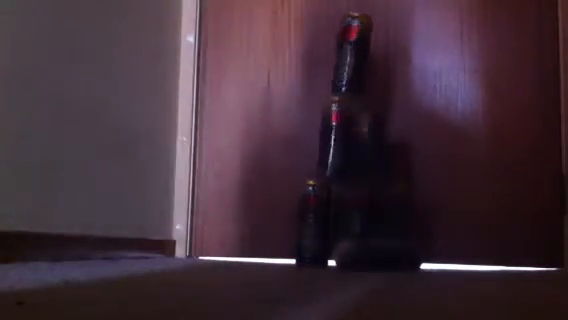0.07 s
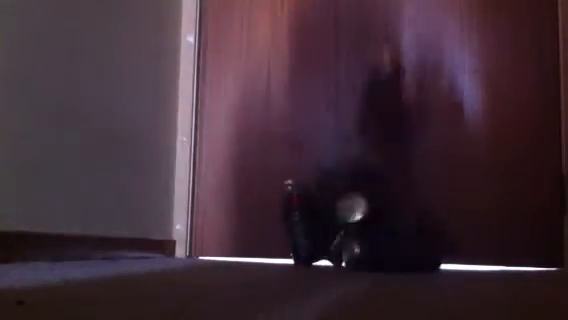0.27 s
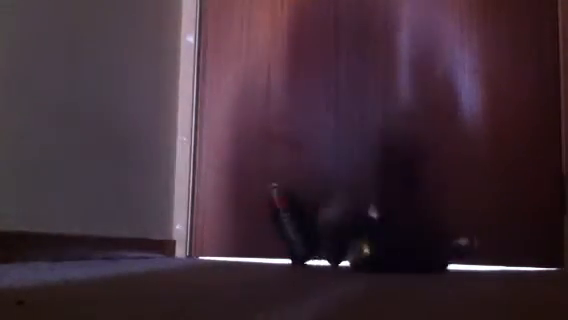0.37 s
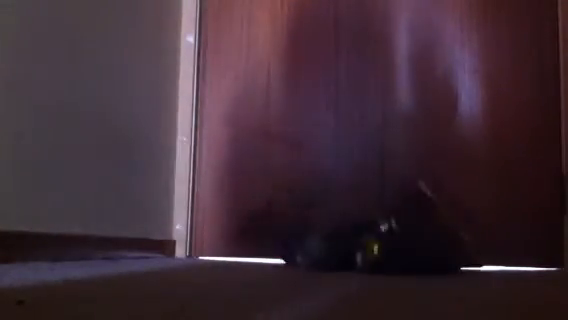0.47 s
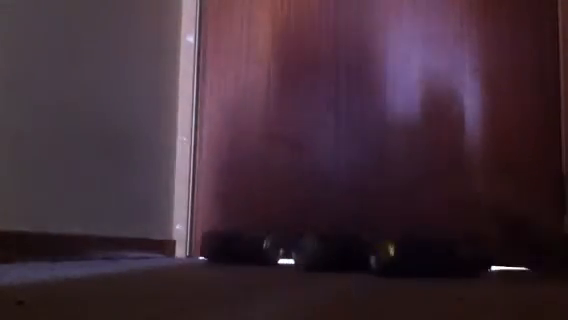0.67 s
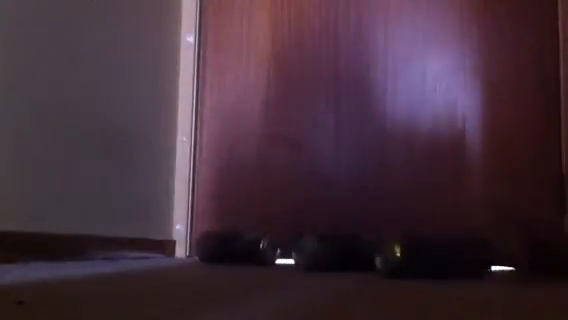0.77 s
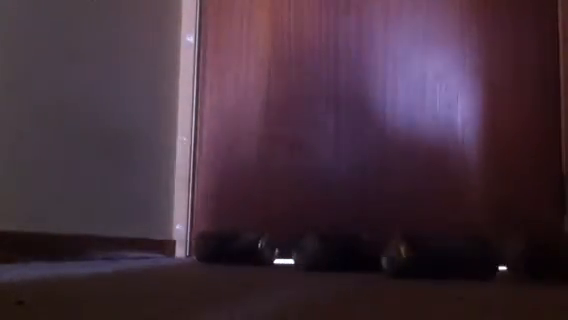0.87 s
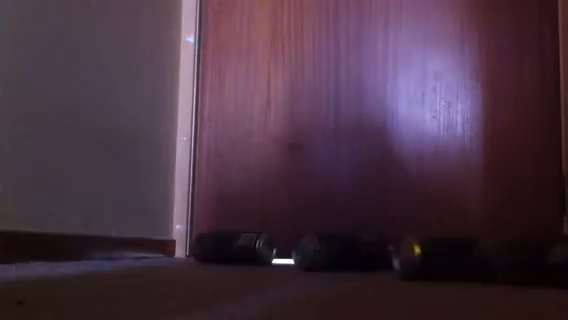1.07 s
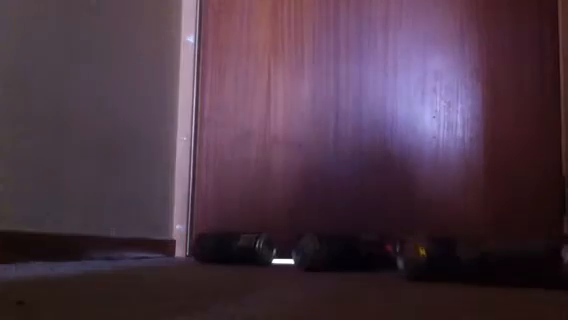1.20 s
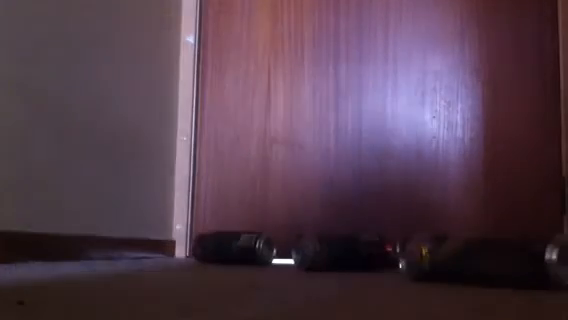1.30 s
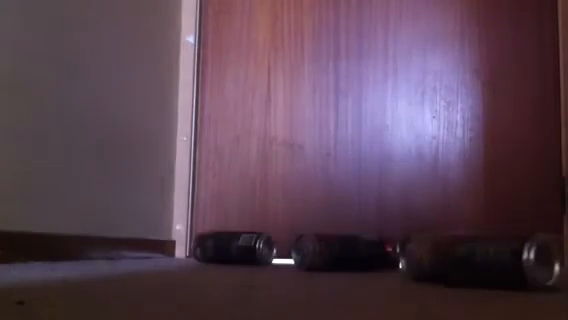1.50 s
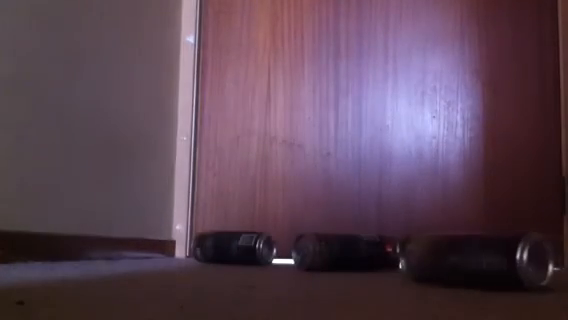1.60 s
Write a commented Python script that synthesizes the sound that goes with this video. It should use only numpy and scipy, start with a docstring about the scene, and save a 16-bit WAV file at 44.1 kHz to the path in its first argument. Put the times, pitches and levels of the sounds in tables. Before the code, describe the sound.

A stack of metal cans collapses close to the microphone in a small room. Light taps lead into dull thuds on the floor, then the cans bounce, clink and skid before settling over faint hiss.

```python
"""A stack of metal cans is knocked over by a wooden door, close to a small microphone in a small room.
Over faint steady hiss come a few light taps and clinks; at 0.2 s the cans hit the floor with dull thuds.
From 0.5 s they bounce again, clinking against each other, their rims chattering as they skid.
The room booms after each blow. The last soft landings come near 1 s, then one rim rolls to rest."""
import sys
import numpy as np
from scipy import signal
from scipy.fft import rfft, irfft
from scipy.io import wavfile

SR = 44100
rng = np.random.default_rng(int(sys.argv[2]) if len(sys.argv) > 2 else 0)


def generate_wav(signal):
    """Clip the signal to [-1, 1] and save it as 16-bit WAV at the path in sys.argv[1]."""
    frames = np.transpose(np.atleast_2d(signal))
    scaled = np.clip(frames, -1, 1) * 32767
    pcm = np.round(scaled).astype(np.int16)
    wavfile.write(sys.argv[1], SR, pcm)


N = 72765

# steady background: (frequency [Hz], spectral density [dB])
HISS_SPECTRUM = [(20, 3), (55, -16.5), (100, -12.5), (190, -3.5), (420, -7), (750, -9.5), (1330, -11.5),
                 (2760, -14.5), (6000, -16), (11000, -20), (15500, -18)]
# decay of the room: (frequency [Hz], t60 [s])
ROOM_DECAY = [(100, 0.55), (300, .4), (1000, 0.36), (4000, 0.33)]
# low resonances of floor, door and room: (frequency [Hz], relative level [dB], t60 [s])
BOOM_MODES = [(93.9, -17.5, 0.69), (129.6, -17, 0.31), (154.2, -9.5, .32), (200.7, -19.5, .47),
              (225.3, -8.5, 0.09), (250.9, -23, 0.51), (288.7, -22, 0.79), (311.3, -11, .28),
              (367, -11.5, .5), (435.4, -7.5, 0.36), (484, -10, 0.12)]
# rims skidding and rolling: (time [s], length [s], level [dB], start pitch [Hz], end pitch [Hz])
RIM_SKIDS = [(.25, 0.026, -47.5, 767, 664), (.300, 0.059, -58.5, 1017, 1020),
             (.575, 0.021, -60, 1030, 1240), (.595, .085, -63.5, 916, 790), (.827, 0.026, -64, 944, 825),
             (1.041, 0.13, -73, 284, 294.3)]
# modes of a can: (frequency [Hz], relative level [dB], t60 [s])
CAN_MODES = [(855.4, -11, 0.94), (970, -6, 0.31), (1007, -8.5, 0.15), (1072, -14, 0.7), (1230, -18, 0.11),
             (1297, -18, .18), (1455, -17.5, .15), (1570, -17, 0.13), (1860, -23.5, .14),
             (2328, -24.5, .12), (2570, -20, .15), (2663, -19.5, 0.14), (2760, -28, 0.24)]
# can striking can: (time [s], level [dB], brightness [dB], share of the free ring time [0-1])
CAN_CONTACTS = [(.079, -46, -3.5, .75), (.112, -53, 0, 0.94), (.206, -40.5, -9.5, 0.32),
                (.254, -41.5, -11, 0.28), (0.533, -63.5, 18, 0.5), (.547, -57.5, -5, .45),
                (.596, -51.5, -4, 0.1), (.828, -63, -5, 0.4), (.954, -65, -8, 0.47)]
# knock of a can wall: (frequency [Hz], spectral density [dB])
KNOCK_SPECTRUM = [(40, -23.5), (90, -19.5), (200, -19.5), (330, 2.5), (450, 12.5), (600, -1), (780, -2.5),
                  (950, -9.5), (1300, -19), (2000, -38), (3000, -36.5), (6000, -47), (16000, -63)]
# cans landing and bouncing: (time [s], thud level [dB], thud pitch [Hz], knock level [dB])
CAN_LANDINGS = [(0.0066, -46, 141, -55), (0.0295, -34, 170.8, -50), (0.0609, -51, 166, -55),
                (0.0864, -42.5, 228, -53), (0.1324, -51.5, 321, -59), (0.1764, -51.5, 196.5, -57.5),
                (0.2065, -20, 185.5, -34.5), (0.2166, -13.5, 243.9, -40.5), (0.2307, -22.5, 290.6, -41),
                (0.2466, -18.5, 200.2, -42.5), (0.2555, -20, 241, -48), (0.2703, -40.5, 227, -59),
                (0.3006, -27.5, 309.7, -52.5), (0.3208, -24.5, 167.5, -51), (0.3306, -28.5, 169.7, -53.5),
                (0.3511, -36.5, 318.5, -56), (0.3786, -41, 166.6, -59.5), (0.4032, -44.5, 291, -75),
                (0.4721, -44.5, 158, -54.5), (0.5032, -38, 218, -49.5), (0.5168, -24.5, 186.3, -49),
                (0.534, -41.5, 281.7, -44.5), (0.5448, -26.5, 178, -39.5), (0.5635, -27.5, 257.7, -59.5),
                (0.577, -29, 219, -51.5), (0.6012, -20.5, 223.5, -45.5), (0.6179, -24, 246.8, -53),
                (0.6356, -26.5, 231.5, -53), (0.6557, -35, 236, -52.5), (0.672, -26, 209.3, -49.5),
                (0.6823, -26, 194.4, -53), (0.7054, -32, 286.5, -60), (0.717, -27.5, 204.5, -59.5),
                (0.7427, -40.5, 313.2, -73), (0.7984, -45, 186, -64.5), (0.8287, -47, 150, -60.5),
                (0.8468, -46, 150.3, -82), (0.877, -44.5, 141, -67), (0.9045, -48.5, 172, -67.5),
                (0.9541, -44.5, 268, -66), (0.9661, -39, 236, -65), (0.9967, -51, 152, -71),
                (1.0263, -50, 172, -82)]


def amp(db):
    """Decibels to gain."""
    return 10 ** (np.asarray(db) / 20)


def curve_at(points, hz):
    """Interpolates a table on a log-frequency axis."""
    table_hz, values = np.transpose(points)
    return np.interp(np.log(hz + 1), np.log(table_hz + 1), values)


def add(mix, start_s, sound):
    """Mixes a sound in at its start time."""
    part = mix[max(round(start_s * SR), 0):][:len(sound)]
    part += sound[:len(part)]


def noise(spectrum):
    """Noise of rms 1 with the given spectrum."""
    gain = amp(curve_at(spectrum, np.fft.rfftfreq(N, 1 / SR)))
    coloured = irfft(rfft(rng.standard_normal(N)) * gain, N)
    return coloured / coloured.std()


def strike(t, rise_s, t60_s):
    """Envelope of a blow: quick rise to 1, exponential decay."""
    shape = (1 - np.exp(-t / rise_s)) * amp(-60 * t / t60_s)
    return shape / shape.max()


def hiss(level_db=-67.5):
    """Faint steady noise lies behind everything."""
    return amp(level_db) * noise(HISS_SPECTRUM)


def room(sound, build_up_s=0.017):
    """Dense reflections reach the microphone from around the room, each band dying at its own speed."""
    hz, t, bands = signal.stft(rng.standard_normal(SR), SR, nperseg=512)
    decay = amp(-60 * t / curve_at(ROOM_DECAY, hz)[:, None])
    _, tail = signal.istft(bands * decay, SR, nperseg=512)
    tail *= np.minimum(np.arange(len(tail)) / SR / build_up_s, 1)
    return signal.fftconvolve(sound, tail / np.linalg.norm(tail))[:N]


def boom(thud, gain_db=-42.5):
    """The thuds set the low resonances of floor, door and room ringing."""
    t = np.arange(SR) / SR
    ring = sum(amp(db - 60 * t / t60) * np.sin(2 * np.pi * hz * t) for hz, db, t60 in BOOM_MODES)
    return amp(gain_db) * signal.fftconvolve(thud, ring)[:N]


def skids(slips_per_s=400, width_hz=120, fade_s=0.0087):
    """Quick uneven slips of a rim keep one resonance of the can wall ringing."""
    out = np.zeros(N)
    pole = np.exp(-np.pi * width_hz / SR)
    for start_s, length_s, db, start_hz, end_hz in RIM_SKIDS:
        t = np.arange(0, length_s, 1 / SR)
        chance, size = rng.random((2, N))[:, :len(t)]
        slips = (chance < slips_per_s / SR) * (0.5 + size)
        pitch_hz = np.linspace(start_hz, end_hz, len(t))
        carrier = np.exp(2j * np.pi * np.cumsum(pitch_hz) / SR)
        # shift down, smooth, shift back up: a resonance that glides with the pitch
        smoothed = signal.lfilter([(1 - pole) ** 2], [1, -2 * pole, pole * pole], slips / carrier)
        ring = (carrier * smoothed).real
        fade = np.clip(np.minimum(t, length_s - t) / fade_s, 0, 1)
        add(out, start_s, amp(db) * fade * ring / (ring.std() + 1e-12))
    return out


def clinks():
    """Cans that meet ring in their modes, each clink with its own brightness and ring length."""
    t, out = np.arange(SR) / SR, np.zeros(N)
    lowest_hz, highest_hz = CAN_MODES[0][0], CAN_MODES[-1][0]
    for start_s, level_db, bright_db, ring_share in CAN_CONTACTS:
        for hz, mode_db, t60 in CAN_MODES:
            tilt_db = bright_db * np.log(hz / lowest_hz) / np.log(highest_hz / lowest_hz)
            ring = strike(t, rise_s=0.001, t60_s=t60 * ring_share) * np.sin(2 * np.pi * hz * t)
            add(out, start_s, amp(level_db + mode_db + tilt_db) * ring)
    return out


def knocks():
    """The damped can wall gives a short toneless knock at each landing."""
    t, power = np.arange(SR // 4) / SR, np.zeros(N)
    envelope = strike(t, rise_s=0.0033, t60_s=0.12)
    for start_s, _, _, db in CAN_LANDINGS:
        add(power, start_s, (amp(db) * envelope) ** 2)
    return np.sqrt(power) * noise(KNOCK_SPECTRUM)


def thuds():
    """Each landing pushes the floor down, and it swings for a few cycles."""
    t, out = np.arange(SR // 4) / SR, np.zeros(N)
    envelope = strike(t, rise_s=0.0022, t60_s=0.062)
    for start_s, db, hz, _ in CAN_LANDINGS:
        add(out, start_s, -amp(db) * envelope * np.sin(2 * np.pi * hz * t))
    return out


def scene():
    """At the microphone, in mono: the cans in front, the room and the hiss behind them."""
    thud, knock, metal = thuds(), knocks(), clinks() + skids()
    reflections = room(amp(-15) * thud + amp(-4) * (knock + metal))
    return (thud + boom(thud) + knock + metal + reflections + hiss())[None]


def record(dry, low_cut_hz=76, high_cut_hz=15850):
    """The deep bass is rolled off, and the highest treble is cut off."""
    low_cut = signal.butter(4, low_cut_hz, "high", fs=SR, output="sos")
    high_cut = signal.firwin(511, high_cut_hz, window=("kaiser", 9), fs=SR)
    return signal.oaconvolve(signal.sosfilt(low_cut, dry), high_cut[None], "same")


dry = scene()
out = record(dry)
generate_wav(out)
```